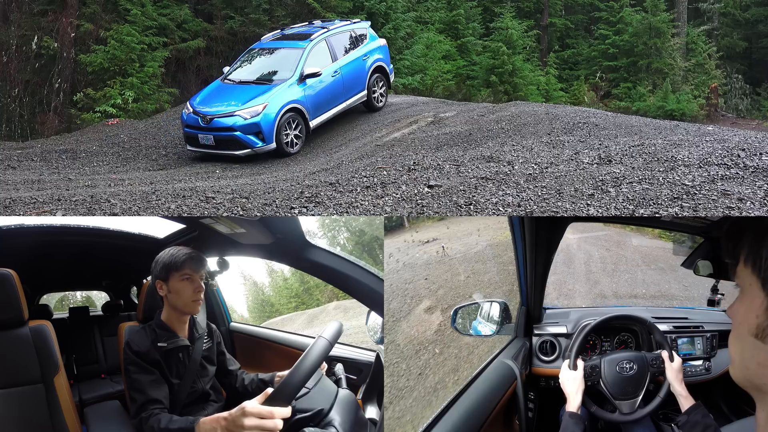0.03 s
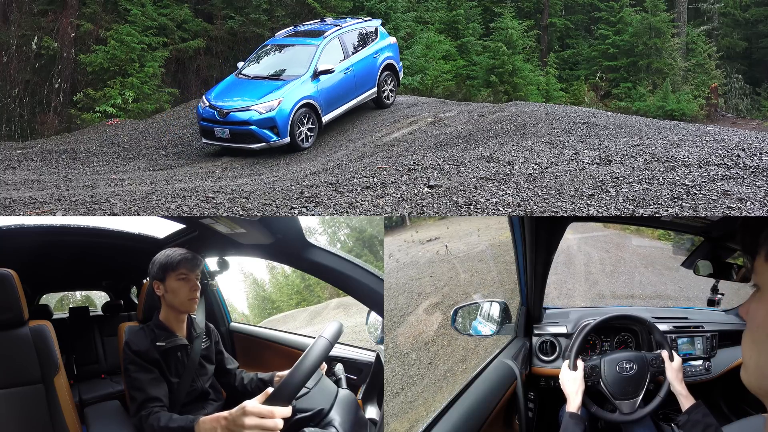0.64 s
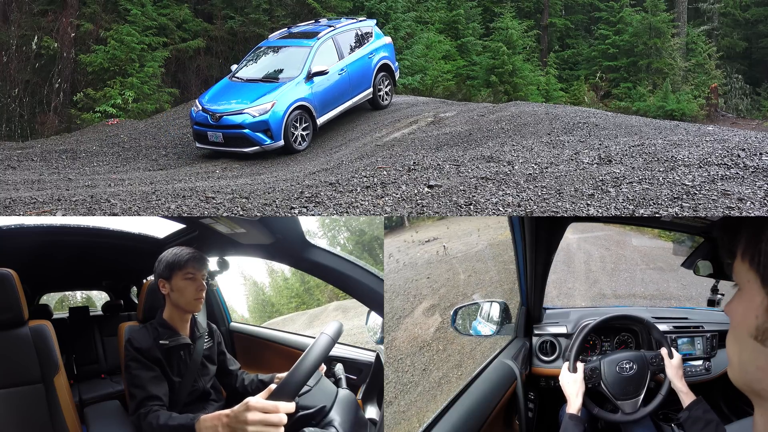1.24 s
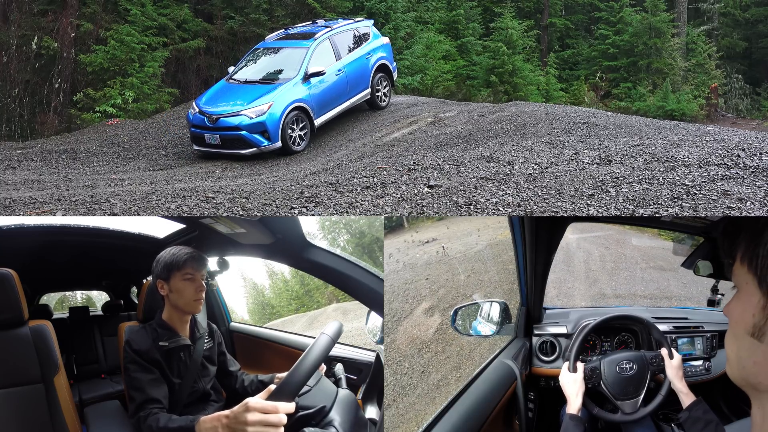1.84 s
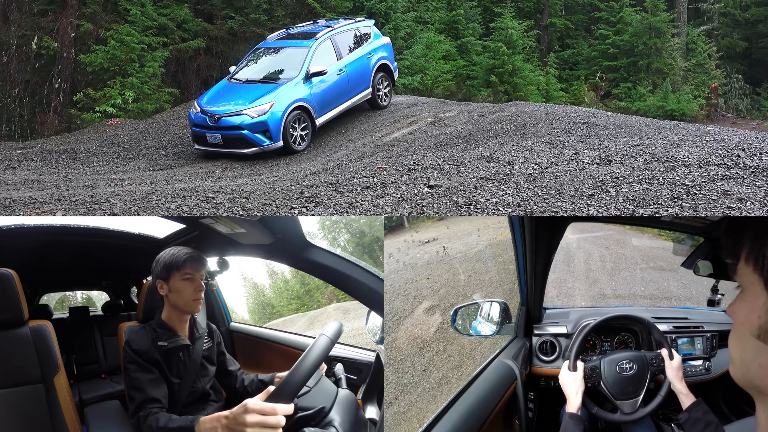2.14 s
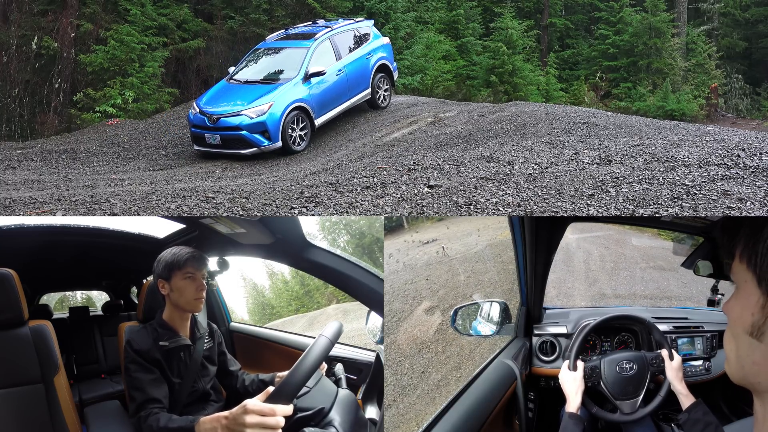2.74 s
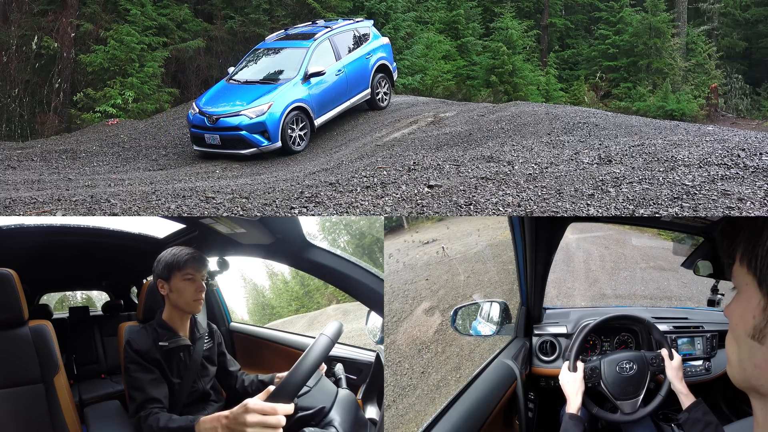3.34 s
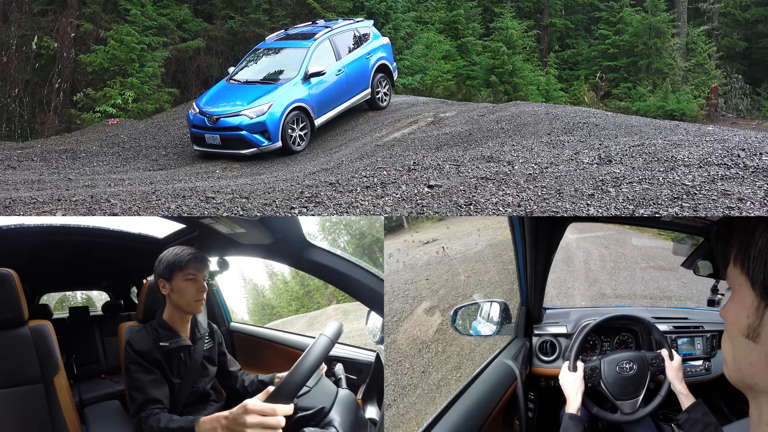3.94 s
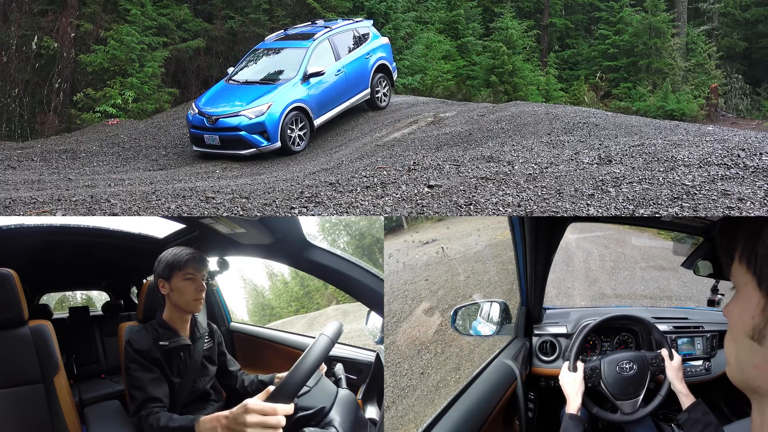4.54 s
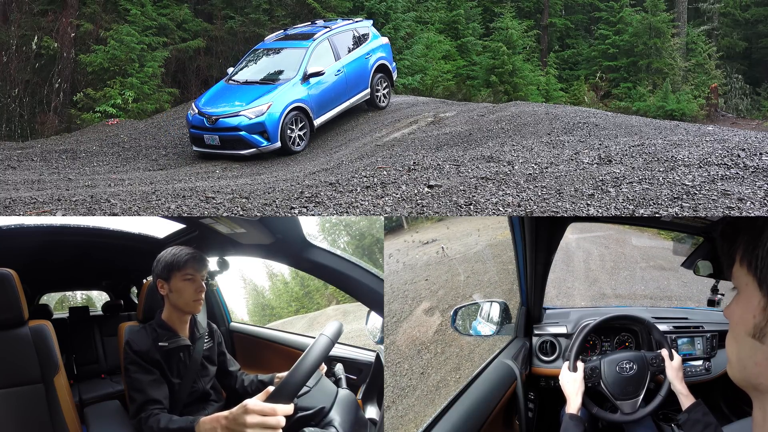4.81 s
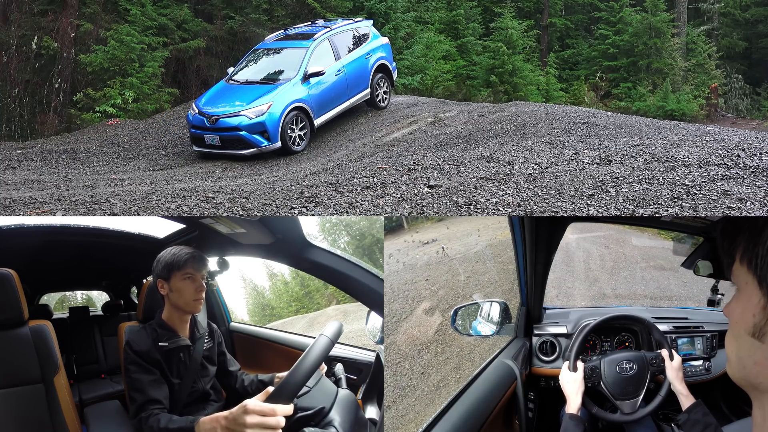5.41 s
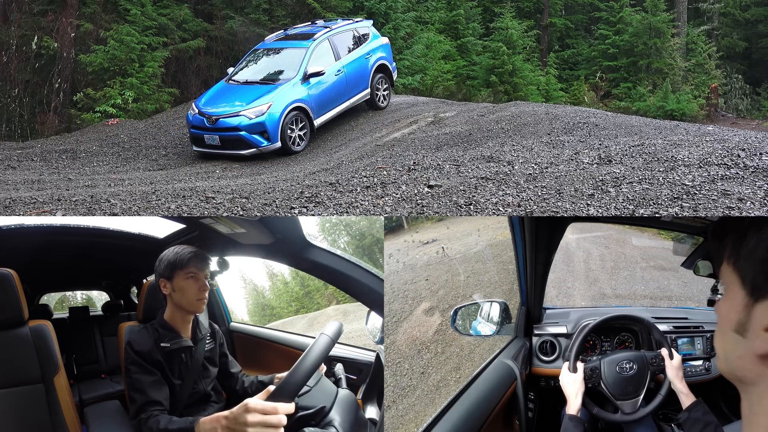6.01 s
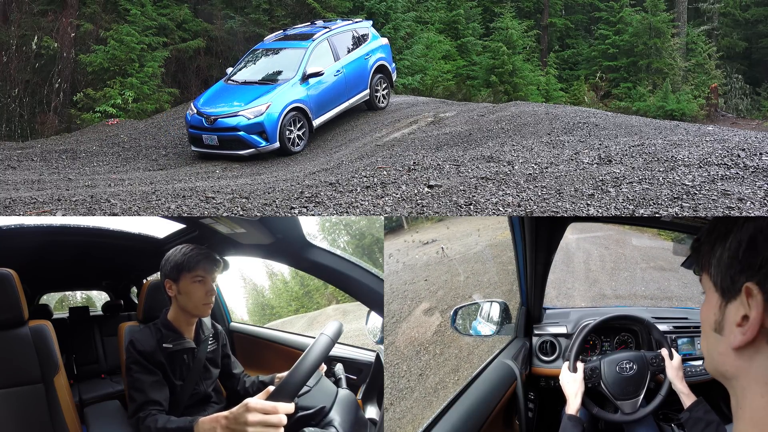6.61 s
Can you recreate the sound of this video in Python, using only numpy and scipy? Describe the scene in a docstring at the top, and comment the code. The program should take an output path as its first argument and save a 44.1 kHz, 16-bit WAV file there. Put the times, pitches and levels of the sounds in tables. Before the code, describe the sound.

A low engine hum dips and then rises into a strained boom as a car climbs rough gravel. Wheels thud, slip and grind through stones, ease off briefly, then churn louder with a humming drone and knocks on the underbody. The microphone sits in the cabin, catching small rattles and soft cloth rustle, and it clicks and crackles on the bass peaks.

```python
"""SUV climbing a gravel hill

Heard from inside, a four-cylinder engine sinks to low revs, then pulls twice up the loose slope.
The wheels pound the body, the air in the tyres rings, stones churn and knock below, the trim rattles.
Low thumps peak with dry overload clicks and crackle; clothing rustles softly close by."""
import sys
import numpy as np
from scipy import signal
from scipy.fft import rfft, irfft, next_fast_len
from scipy.io import wavfile
from scipy.ndimage import uniform_filter1d, map_coordinates

SR = 44100
rng = np.random.default_rng(int(sys.argv[2]) if len(sys.argv) > 2 else 0)


def store_pcm(level_fs):
    """Save levels as 16-bit WAV."""
    pcm = np.round(np.clip(level_fs, -1, 1) * 32767).astype(np.int16)
    wavfile.write(sys.argv[1], SR, np.atleast_2d(pcm).T)


N = 293706
TIME = np.arange(N) / SR


# Each row: time in seconds, firing rate in Hz, pull in dB.
ENGINE_RUN = [(0, 53.2, -6.5), (.12, 46.64, -12.5), (.4, 40.29, -17.5), (.7, 38.76, -13),
              (.97, 41.4, -13.5), (1.15, 50.85, -2), (1.35, 61.53, -3), (1.9, 64.98, -3),
              (2.35, 66.14, -3.5), (2.48, 70.04, -0.5), (2.8, 56.92, -10.5), (3.0, 56.17, -2.5),
              (3.25, 55.58, -2.5), (3.65, 56.21, -3.5), (4.05, 62.26, 2), (4.42, 63.25, -3),
              (4.85, 68.97, 4), (5.45, 70.58, 2.5), (6.05, 70.48, 5), (6.25, 65.16, -8.5), (6.4, 64.43, 2),
              (6.6, 63.95, -24)]
# Cabin response to the firing tone and its octave. Each row: frequency in Hz, gain in dB.
CABIN_BOOM = [(38, -7.5), (44, -14), (51, -11), (56, -25.5), (64, -28), (71, -27.5), (80, -22), (92, -30.5),
              (104, -19.5), (122, -13.5), (131, -16.5), (141, -21.5)]
# Path from engine to cabin. Each row: frequency in Hz, gain in dB.
FIREWALL = [(60, -42.5), (122, -25.5), (165, -42.5), (205, -44.5), (250, -40.5), (300, -50), (390, -50.5),
            (450, -53.5), (550, -48), (600, -55.5), (690, -59), (1000, -67.5), (1500, -68.5)]
# Each entry: multiple of the firing rate, boost in dB.
OVERTONE_BOOSTS = {3: 3, 4: 4, 5: 4, 6: 4, 7: 5, 9: 5, 10: 2}

def engine(hz, pull_db, breakup, waver_db=2.5, flutter_db=1.6, flutter_rad=.4, smear_rad=.24):
    """Firings boom in the cabin; overtones and clatter cross the firewall. Returns sound and phase."""
    firing_db = lookup(hz, CABIN_BOOM) + .64 * pull_db
    octave_db = lookup(2 * hz, CABIN_BOOM) + .64 * pull_db
    phase = phase_of(hz * (1 + .002 * walk(30)))
    tones = undb(firing_db + waver_db * walk(8.1)) * np.sin(phase)
    octave_gain = undb(octave_db - breakup * flutter_db * walk(15) ** 2)
    tones += octave_gain * np.sin(2 * phase + flutter_rad * breakup * walk(24))
    for multiple in np.arange(1.5, 12, .5):
        # unequal cylinders put weaker tones halfway between the multiples
        db = OVERTONE_BOOSTS.get(multiple, 0) - 5 * (multiple % 1 > 0) + rng.standard_normal()
        db = db + lookup(multiple * hz, FIREWALL) + .89 * pull_db + waver_db * walk(12)
        tones += undb(db) * np.sin(multiple * phase + 2 * np.pi * rng.random() + smear_rad * walk(20))
    throb = 1 + .5 * np.sin(phase)
    clatter = unit(colour(rng.standard_normal(N) * throb, FIREWALL))
    return np.sqrt(2) * tones + clatter * undb(-38 + .43 * pull_db), phase


# Each row: start in seconds, end in seconds, level in dB.
ROUGH_GROUND = [(1.199, 3.263, -15), (4.096, 4.645, -16), (4.775, 6.43, -18.5)]

def pounding(attack_s=.057, release_s=.19, sag_db_per_s=1):
    """Power of the shaking on rough ground: sets in fast, eases as the wheels dig in, dies away."""
    power = 0
    for start, end, db in ROUGH_GROUND:
        since_s = np.maximum(TIME - start, 0)
        shape = np.minimum(since_s / attack_s, 1) * np.exp(-np.maximum(TIME - end, 0) / release_s)
        power = power + (shape * undb(db - sag_db_per_s * since_s)) ** 2
    return power


# Dips in the track. Each row: middle in seconds, half length in seconds, level in dB.
LURCHES = [(.1, 0.24, -23.5), (.97, 0.095, -21), (1.16, 0.054, -17), (1.5, 0.16, -15.5), (3.25, 0.046, -15),
           (3.42, 0.17, -18), (3.82, 0.2, -22.5), (4.95, 0.24, -23.5), (5.35, 0.054, -11.5),
           (6.0, 0.099, -14.5), (6.4, .12, -14.5), (6.6, 0.11, -8)]
# Body and floor spectra. Each row: frequency in Hz, gain in dB.
BODY_HEAVE = [(8, -33), (18, -6.5), (28, 2.5), (42, -3), (52, -14.5), (70, -35)]
FLOOR_DRUM = [(35, -21.5), (50, 1.5), (65, 1.5), (85, 1), (105, -10), (145, -4), (172, -18.5), (240, -21.5),
              (330, -48.5)]
# Air modes in the tyres. Each row: frequency in Hz, width in Hz, gain in dB.
TYRE_AIR = [(196, 7, -4.5), (212.3, 6, -8.5)]

def ride(shaking, tyre_db, surge_db=2):
    """Stones under the wheels rock the body, drum the floor and ring the air in the tyres."""
    heave = np.sqrt(shaking ** 2 + swell_power(LURCHES))
    body = even(colour(impacts(150, 1), BODY_HEAVE), .027) * heave
    floor = even(colour(impacts(300, 4.74), FLOOR_DRUM), .045) * shaking
    air = even(ring_modes(impacts(500, 4.7), TYRE_AIR), .097)
    return body + floor + air * undb(tyre_db + surge_db * walk(13))


# How hard the wheels churn. Each row: time in seconds, level in dB.
CHURN = [(0, -53.5), (1.05, -57.5), (1.26, -33), (1.4, -28.5), (1.6, -36), (1.74, -33), (1.87, -38),
         (2.12, -31), (2.33, -30.5), (2.46, -25.5), (2.65, -30.5), (2.78, -34.5), (3.15, -36), (3.45, -48),
         (4.05, -44.5), (4.25, -32.5), (4.8, -25.5), (5.2, -22.5), (5.9, -23), (6.49, -24), (6.55, -48.5)]
# The wheels bite and throw stones. Each row: middle in seconds, half length in seconds, level in dB.
SPRAYS = [(1.36, 0.13, -47.5), (1.72, 0.09, -50), (1.95, 0.053, -49), (2.15, 0.044, -54),
          (2.44, 0.11, -51.5), (4.23, 0.085, -58), (4.5, 0.042, -48), (5.27, 0.097, -55), (5.77, .09, -60),
          (6.08, 0.066, -44.5)]
# Body modes under spinning wheels. Each row: frequency in Hz, width in Hz, gain in dB.
GROWL_MODES = [(289.3, 20, -6), (323.6, 44.3, -1), (413.3, 77, -8), (473, 95, -16)]
# Spectra of stones against tyres and wheel arches. Each row: frequency in Hz, gain in dB.
ROAR_SPECTRUM = [(150, -4.5), (230, -1), (270, 2), (330, 3), (420, -1.5), (500, 1.5), (550, -2),
                 (610, -6.5), (670, -8.5), (720, -7), (850, -20.5), (1300, -46.5)]
CRUNCH_SPECTRUM = [(450, -25), (750, 1.5), (1000, 3), (1400, -4), (1900, -8.5), (2400, -17.5), (3200, -19),
                   (4000, -24), (5000, -30.5), (12000, -49.5)]

def gravel(churn_db, slip_db, firing_phase, growl_gain_db=-5, roar_gain_db=14, surge_db=2.15):
    """Churned stones make a ringing growl, a dull roar and a crunch, all throbbing with each firing."""
    throb = 1 + .21 * np.sin(firing_phase)
    ring = ring_modes(impacts(900, 3.5) * throb, GROWL_MODES)
    # the wheels slip and grip, so the growl wanders in pitch and surges
    growl = even(bend(ring, 1 + .04 * walk(9)), .086)
    growl *= undb(churn_db + growl_gain_db + surge_db * walk(12))
    roar = even(colour(impacts(1000, 3.36) * throb, ROAR_SPECTRUM), .17) * undb(roar_gain_db)
    crunch = even(colour(impacts(2200, 2.6) * throb, CRUNCH_SPECTRUM), .52)
    stone_gain = np.sqrt(undb(-50 + .35 * slip_db) ** 2 + swell_power(SPRAYS))
    return growl + (roar + crunch) * stone_gain


# Each row: start in seconds, end in seconds, level in dB.
STEADY_SPINS = [(1.9, 2.58, -35), (3.08, 3.3, -33), (4.78, 5.43, -24.5), (5.49, 5.76, -24.5),
                (5.97, 6.25, -24.5), (6.4, 6.56, -27)]

def tyre_drone(waver_db=1, drift=.004, fade_s=.063):
    """While a wheel spins steadily, the air in its tyre holds one low note."""
    strength = sum(undb(db) * gate(start, end, fade_s) for start, end, db in STEADY_SPINS)
    phase = phase_of(TYRE_AIR[0][0] * (1 + drift * walk(9)))
    return np.sqrt(2) * strength * undb(waver_db * walk(11)) * np.sin(phase)


# Each row: middle in seconds, half length in seconds, level in dB, pitch in Hz, glide in Hz per second.
TYRE_SLIPS = [(1.34, 0.087, -40, 549, 0), (1.716, 0.073, -35, 330, 0), (2.12, .08, -30.5, 289, -400),
              (2.473, 0.15, -29, 295.4, 0), (2.653, 0.034, -26, 339.5, -1), (3.17, 0.031, -33, 307, 0),
              (4.001, 0.13, -36, 280, 99.5), (4.29, .06, -33.5, 300, 0), (4.516, .05, -24, 166, 1),
              (4.689, 0.045, -18, 161, 2), (4.85, .06, -33.5, 384, 0), (5.02, 0.081, -27.5, 322, -450),
              (5.186, 0.062, -21, 329.3, -100), (5.28, 0.08, -30, 425.5, 0),
              (5.449, 0.084, -26.5, 330.2, -350), (5.59, 0.056, -25.5, 336, -500),
              (5.759, .08, -29.5, 440, 400), (5.792, .09, -24.5, 331.7, 400.5),
              (5.885, .045, -24.5, 298, -400), (6.072, 0.065, -27.5, 324.3, 399.5),
              (6.08, 0.079, -32, 477.4, -0.5), (6.271, 0.04, -24, 322.9, 1), (6.44, .1, -19, 180.1, 150.5),
              (6.465, 0.048, -27, 335.9, 0)]

def tyre_groans(width_hz=16):
    """A tyre slips and judders: a narrow, rough ring that glides as the wheel speeds up or grips."""
    out = np.zeros(N)
    for s, half_s, db, hz, glide in TYRE_SLIPS:
        ring = even(ring_modes(impacts(1500, 3), [(hz, width_hz, 0)]), .05)
        speed = 1 + glide / hz * np.clip(TIME - s, -half_s, half_s)
        out += bend(ring, speed) * np.sqrt(swell_power([(s, half_s, db)]))
    return out


# Each row: time in seconds, relative level in dB, click resonance in Hz.
OVERLOAD_PEAKS = [(1.423, -30.5, 3920), (1.4463, -37, 3500), (1.4708, -34, 3000), (1.498, -30, 2000),
                  (1.562, -31, 1700), (1.7384, -26.5, 2100), (1.797, -34, 3000), (1.809, -30, 2500),
                  (1.878, -36, 3000), (1.925, -34.5, 1900), (1.9441, -39.5, 4500), (1.97, -31, 1600),
                  (1.9825, -36, 4000), (2.012, -36, 3000), (2.043, -36.5, 3400), (2.093, -27.5, 2700),
                  (2.1389, -28.5, 2800), (2.205, -41, 4000), (2.2303, -31.5, 1999), (2.285, -31, 3000),
                  (2.309, -33, 2600), (2.4016, -29, 1900), (2.4415, -36, 2700), (2.567, -33.5, 3400),
                  (2.7299, -30.5, 1700), (2.8785, -27, 2148), (3.1197, -34.5, 2200), (3.2636, -28.5, 1800),
                  (3.2987, -30.5, 2300), (4.176, -35.5, 2200), (4.242, -34.5, 2200), (4.2562, -36, 4000),
                  (4.3273, -27, 2800), (4.3945, -32, 2500), (4.532, -29, 2200), (4.5507, -40, 4000),
                  (4.5802, -36, 3000), (4.695, -29, 3000), (5.197, -39, 3000), (5.208, -42, 3022),
                  (5.3674, -36.5, 4600), (6.4512, -38, 3000), (6.455, -39, 3000), (6.5216, -23.5, 2900),
                  (6.5322, -37, 3500), (6.5877, -31.5, 1500), (6.6045, -38, 2200), (6.6259, -37.5, 2497)]
# Each row: frequency in Hz, gain in dB.
CLICK_SPECTRUM = [(600, -1), (1500, -0.5), (2900, -5), (4500, -7), (6000, -7), (10000, -11.5), (15000, -15)]

def overload_thumps(click_s=.0011, click_db=-5, ring_db=-8, thump_s=.0033, thump_db=22, lead_s=.03):
    """Low thumps with a dry overload click at each bass peak."""
    t = np.arange(int(2 * lead_s * SR)) / SR - lead_s
    thump = (1 - (t / thump_s) ** 2) * np.exp(-.5 * (t / thump_s) ** 2)
    window = np.exp(-.5 * (t / click_s - 1) ** 2)
    window_rms = np.sqrt(np.mean(window ** 2))
    clicks, thumps = np.zeros(N), np.zeros(N)
    for s, db, ring_hz in OVERLOAD_PEAKS:
        burst = unit(rng.standard_normal(len(t)) * window)
        ring = unit(resonate(burst, ring_hz, width_hz=1100)) * undb(ring_db)
        add(clicks, s - lead_s, undb(db + click_db) * window_rms * (burst + ring))
        add(thumps, s - lead_s, undb(db + thump_db) * thump)
    return colour(clicks, CLICK_SPECTRUM) + thumps


def overload_crackle(shaking, gain_db=-50, click_s=.0006):
    """Faint overload crackle that grows with the loud bass rumble."""
    bursts = signal.lfilter([1], [1, -np.exp(-1 / (click_s * SR))], np.abs(impacts(120, 1.3)))
    return unit(colour(bursts * rng.standard_normal(N), CLICK_SPECTRUM)) * shaking * undb(gain_db)


# Each row: start in seconds, level in dB, ring pitch in Hz.
STONE_KNOCKS = [(2.9745, -39, 2350), (4.636, -39, 1350), (5.0125, -29.5, 1600), (5.0203, -32.5, 1750),
                (5.029, -34.5, 1850), (6.084, -22.5, 1290), (6.0903, -27, 1260), (6.1065, -35, 1900),
                (6.1165, -35, 1950), (6.1255, -37, 1850), (6.1945, -35, 1150), (6.201, -27.5, 1250)]
# Each row: multiple of the ring pitch, gain in dB.
UNDERBODY_MODES = [(.72, -9), (1, 1), (1.28, -11), (1.93, -10)]

def stone_knocks(attack_s=.0006, t60_s=.028, grit_db=-17, grit_s=.0023, detune=.015):
    """Thrown stones strike the underbody: a gritty contact and a short, hollow ring."""
    t = np.arange(SR // 16) / SR
    attack = 1 - np.exp(-t / attack_s)
    out = np.zeros(N)
    for s, db, hz in STONE_KNOCKS:
        ring = np.zeros(len(t))
        for ratio, mode_db in UNDERBODY_MODES:
            mode_hz = hz * ratio * (1 + detune * rng.standard_normal())
            ring += undb(mode_db - 60 * t / t60_s) * np.sin(2 * np.pi * mode_hz * t)
        grit = unit(resonate(rng.standard_normal(len(t)), hz=2500, width_hz=2000))
        grit *= undb(grit_db) * np.exp(-t / grit_s)
        add(out, s, undb(db) * attack * (ring + grit))
    return out


# Each row: multiple of the firing rate, base level in dB.
BELT_WHINES = [(9.1, -43.5), (13.5, -49.5)]
# Path from belt to cabin. Each row: frequency in Hz, gain in dB.
BELT_PATH = [(340, -9), (385, 3), (420, -7), (500, -7), (560, 1), (610, -3), (660, -16), (950, -30)]

def belt_whines(hz, pull_db, breakup, waver_db=2.5, shaken_db=-3, drift=.003, shaken_drift=.012):
    """Belt-driven parts sing along with the engine and blur on rough ground."""
    out = np.zeros(N)
    for multiple, base_db in BELT_WHINES:
        db = base_db + .3 * pull_db + lookup(multiple * hz, BELT_PATH)
        db += waver_db * walk(9.7) + shaken_db * breakup
        pitch_hz = multiple * hz * (1 + (drift + shaken_drift * breakup) * walk(40))
        out += np.sqrt(2) * undb(db) * np.sin(phase_of(pitch_hz))
    return out


# Each row: start in seconds, relative level in dB, length in seconds, ring pitch in Hz, ring gain in dB.
RATTLES = [(1.706, -56, 0.017, 1993, -11.5), (2.358, -59, 0.065, 2800, -10),
           (2.591, -59.5, 0.077, 3500, -11), (2.65, -46.5, 0.024, 8020, -2), (2.761, -56, 0.02, 8100, -1.5),
           (2.973, -56, 0.022, 2368, -4), (4.518, -55.5, .016, 3795, -12), (4.637, -56, 0.024, 1350, 2),
           (4.741, -54.5, 0.025, 4940, -9), (4.959, -55, 0.041, 8396, -8), (5.01, -55, 0.048, 1750, -1),
           (5.462, -55.5, .015, 5200, -8), (5.503, -48, 0.028, 3370, -18), (5.767, -59.5, 0.027, 3800, -10),
           (5.859, -58.5, .04, 3850, -8), (6.085, -61, 0.017, 2447, 8), (6.103, -49.5, 0.033, 1880, -1),
           (6.137, -50, 0.035, 8650, -6.5), (6.2, -52, 0.013, 8450, 0.5), (6.192, -58, 0.023, 1160, 11)]
# Each row: frequency in Hz, gain in dB.
TRIM_SPECTRUM = [(500, -1.5), (1300, 8), (3500, 4.5), (6000, 0), (9500, -4), (12000, -23.5), (15000, -39)]

def trim_rattles(attack_s=.00026, ring_width_hz=330, grain_db=3, gain_db=3):
    """Loose things in the cabin chatter in short scrapes, each with its own resonance."""
    t = np.arange(SR // 4) / SR
    out = np.zeros(N)
    for s, db, length_s, ring_hz, ring_db in RATTLES:
        chatter = rng.standard_normal(len(t)) * undb(grain_db * rng.standard_normal(len(t)))
        ring = resonate(resonate(chatter, ring_hz, ring_width_hz), ring_hz, ring_hz / 2)
        scrape = unit(colour(chatter, TRIM_SPECTRUM)) + undb(ring_db) * unit(ring)
        shape = (1 - np.exp(-t / attack_s)) * np.exp(-(t / length_s) ** 2.8)
        add(out, s, undb(db + gain_db) * shape * scrape)
    return out


# Each row: middle in seconds, half length in seconds, relative level in dB.
SWISHES = [(.16, 0.066, -60), (.42, 0.11, -61), (.65, 0.14, -56.5), (.92, 0.11, -58.5),
           (1.16, 0.044, -57.5), (1.3, 0.083, -56), (1.66, .12, -60), (2.64, 0.16, -63), (4.27, 0.1, -64.5),
           (5.02, 0.085, -62), (5.55, 0.29, -68.5), (6.08, 0.2, -60.5), (6.28, .04, -59),
           (6.46, 0.049, -61.5)]
# Each row: frequency in Hz, gain in dB.
CLOTH_SPECTRUM = [(900, -25.5), (2200, 2), (3200, 0.5), (5000, -2), (6500, -0.5), (8500, 1.5),
                  (10000, -0.5), (12000, -6), (15000, -11.5)]

def cloth_rustle(hiss_db=-67, gain_db=2.5):
    """Fine, soft friction of cloth, in swishes over a faint steady hiss."""
    strength = np.sqrt(swell_power(SWISHES) + undb(hiss_db) ** 2)
    return unit(colour(impacts(14000, 1.6), CLOTH_SPECTRUM)) * strength * undb(gain_db)


# Each row: start in seconds, end in seconds, centre in Hz, width in Hz, level in dB.
DRIVE_HISS = [(3.3, 4.2, 2955, 130, -78), (3.3, 4.2, 3720, 180, -78), (5.1, 6.05, 1486, 22, -63),
              (5.5, 6.05, 3182, 70, -72)]

def drive_hiss(fade_s=.08):
    """The drive sings faintly in narrow bands of noise."""
    out = np.zeros(N)
    for start, end, hz, width_hz, db in DRIVE_HISS:
        band = unit(resonate(rng.standard_normal(N), hz, width_hz))
        out += band * undb(db) * gate(start, end, fade_s)
    return out


def undb(db):
    """Decibels to gain."""
    return np.exp(np.asarray(db) * (np.log(10) / 20))


def unit(x):
    """Scale to rms 1."""
    return x / np.sqrt(np.mean(x ** 2))


def lookup(hz, response):
    """Gain in dB of a response at a frequency."""
    return np.interp(hz, *np.transpose(response))


def phase_of(hz):
    """Running phase in radians of a moving pitch."""
    return 2 * np.pi * np.cumsum(hz) / SR


def curves(table):
    """Each column of a table, joined by straight lines in time."""
    s, *columns = np.transpose(table)
    return [np.interp(TIME, s, column) for column in columns]


def gate(start_s, end_s, fade_s):
    """Window with linear fades."""
    return np.clip(np.minimum(TIME - start_s, end_s - TIME) / fade_s, 0, 1)


def swell_power(table):
    """Summed power of bell-shaped swells."""
    return sum(undb(db) ** 2 * np.exp(-2 * ((TIME - s) / half_s) ** 2) for s, half_s, db in table)


def colour(x, outline):
    """Minimum-phase filter with a (Hz, dB) outline, falling 20 dB per octave beyond its ends."""
    size = 2 * next_fast_len(len(x) // 2 + 4096)
    hz, db = np.transpose(outline)
    octave = np.log2(np.maximum(np.arange(size // 2 + 1) * SR / size, 1))
    outside = np.abs(octave - np.clip(octave, np.log2(hz[0]), np.log2(hz[-1])))
    gain = undb(np.interp(octave, np.log2(hz), db) - 20 * outside)
    cepstrum = irfft(np.log(gain))
    cepstrum[1:size // 2] *= 2
    cepstrum[size // 2 + 1:] = 0
    return irfft(rfft(x, size) * np.exp(rfft(cepstrum)))[:len(x)]


def resonate(x, hz, width_hz):
    """One resonance, gain 1 at its centre."""
    return signal.lfilter(*signal.iirpeak(hz, hz / width_hz, fs=SR), x)


def ring_modes(x, modes):
    """Sum of resonances, each applied twice for steeper skirts."""
    return sum(undb(db) * resonate(resonate(x, hz, width), hz, width) for hz, width, db in modes)


def bend(x, speed):
    """Run a vibration faster or slower, so that its pitch moves."""
    return map_coordinates(x, [np.cumsum(speed)], order=1, mode="mirror")


def walk(rate_hz):
    """Smooth random wander with spread near 1."""
    steps = TIME * rate_hz + rng.random()
    k = steps.astype(int)
    levels, part = rng.standard_normal(k[-1] + 2), steps - k
    return 1.15 * (levels[k] + np.diff(levels)[k] * part * part * (3 - 2 * part))


def impacts(per_s, spread_db):
    """Randomly timed small blows of unequal strength."""
    hit = rng.random(N) < per_s / SR
    strength = undb(spread_db * np.minimum(rng.exponential(size=N), 4))
    return hit * strength * rng.choice([-1, 1], N)


def even(x, span_s):
    """Hold the rms of a vibration near 1 over the given span."""
    k = int(span_s * SR)
    return x / np.sqrt(uniform_filter1d(uniform_filter1d(x ** 2, k), k) + 1e-18)


def add(out, s, sound):
    """Mix a sound in at a time."""
    start = max(int(s * SR), 0)
    out[start:start + len(sound)] += sound[:N - start]


def scene():
    """The cabin mix: the ground shakes the body; the churning drives the gravel and the tyre ring."""
    hz, pull_db = curves(ENGINE_RUN)
    churn_db, = curves(CHURN)
    slip_db = churn_db + 30  # 0 dB at the usual churn
    hz = hz * (1 + .004007 * undb(slip_db) * walk(8))  # revs hunt as the wheels slip and grip
    rolling = undb(-31 + .69 * pull_db)  # shaking on smooth ground
    shaking = np.sqrt(pounding() + rolling ** 2)
    breakup = np.minimum(shaking / undb(-17), 1)  # at 1 the engine's octave and whines flutter fully
    motor, firing_phase = engine(hz, pull_db, breakup)
    wheels = ride(shaking, tyre_db=-35 + .5 * slip_db) + gravel(churn_db, slip_db, firing_phase)
    overload = overload_crackle(shaking) + overload_thumps()
    cabin = trim_rattles() + cloth_rustle()
    drive = belt_whines(hz, pull_db, breakup) + drive_hiss()
    wheels += tyre_drone() + tyre_groans() + stone_knocks()
    return (motor + drive + wheels + overload + cabin)[None]


def record(dry):
    """A soft limiter rounds the biggest bass swings; a steep low-pass cuts the top."""
    ceiling, top_hz = .88, 15200
    rounded = dry / (1 + np.abs(dry / ceiling) ** 8) ** (1 / 8)
    return signal.sosfilt(signal.ellip(8, .2, 70, top_hz, fs=SR, output="sos"), rounded)


dry = scene()
out = record(dry)
store_pcm(out)
```